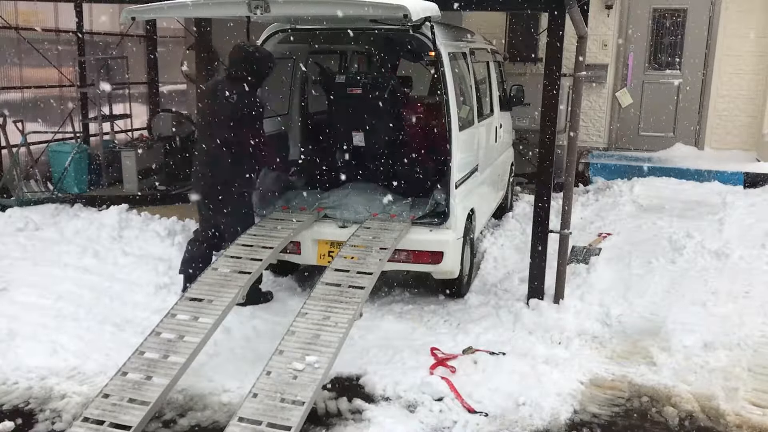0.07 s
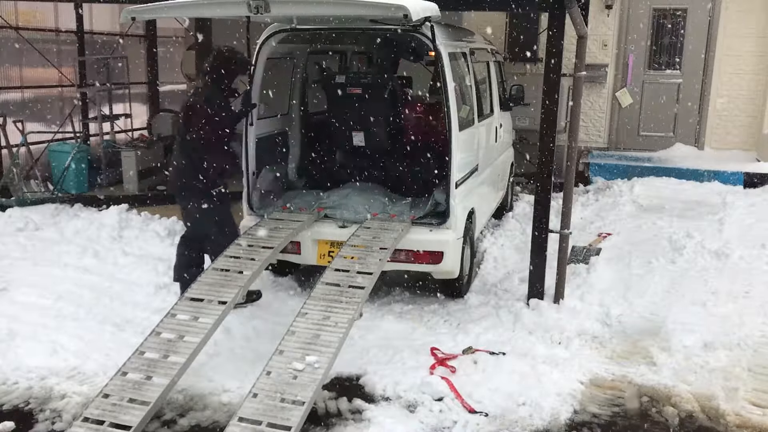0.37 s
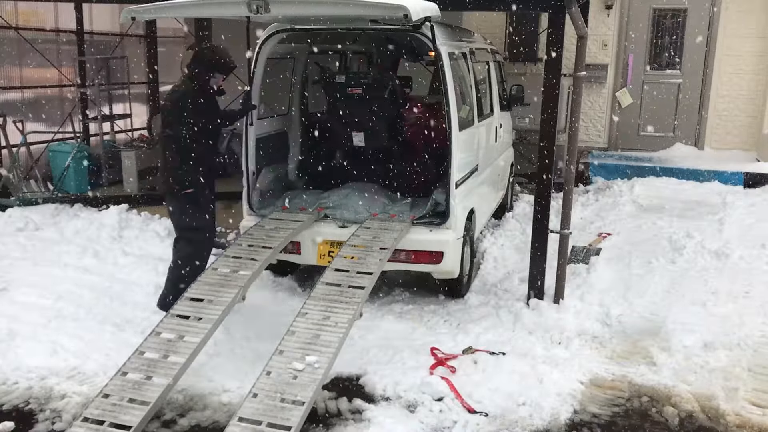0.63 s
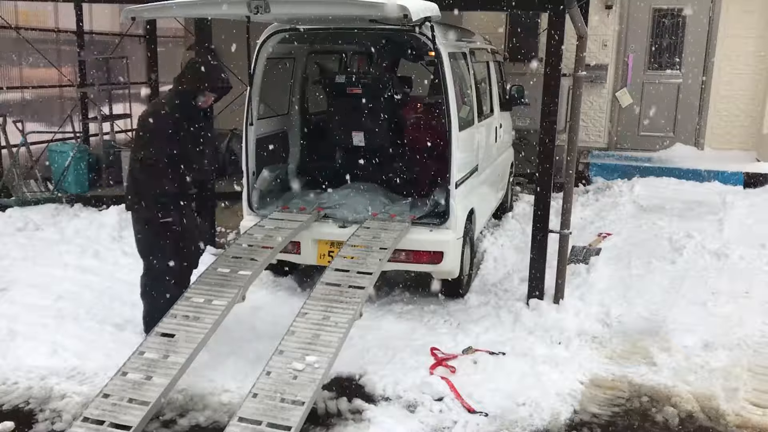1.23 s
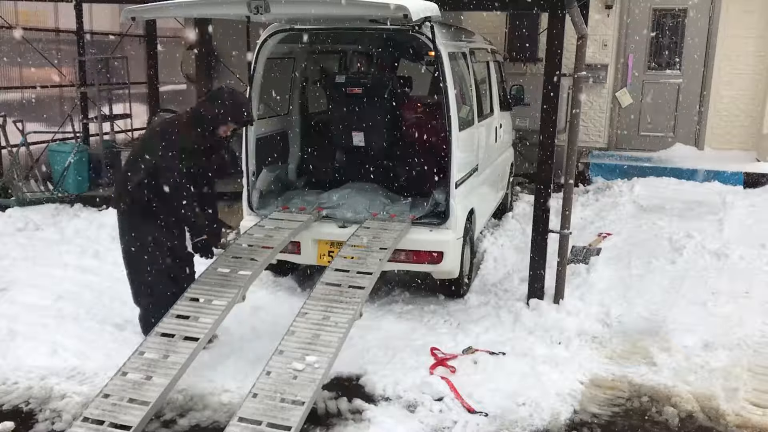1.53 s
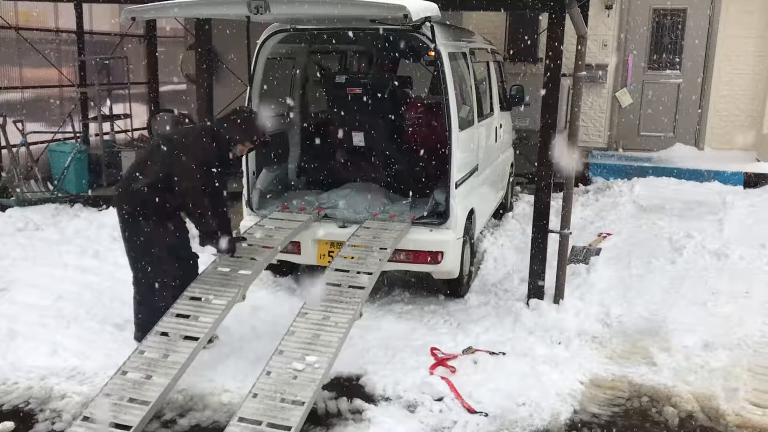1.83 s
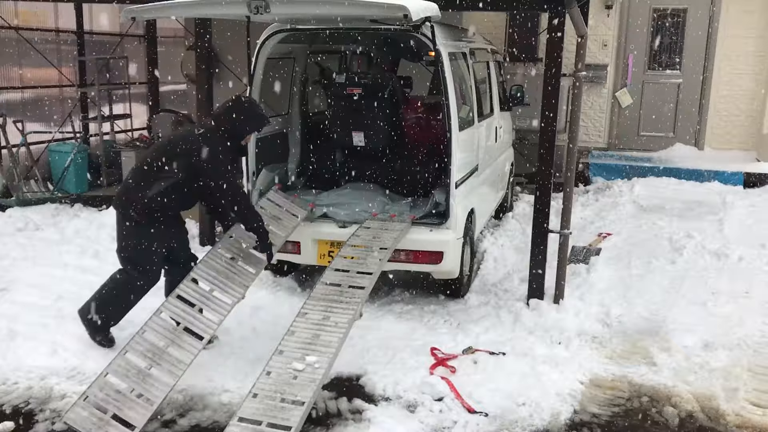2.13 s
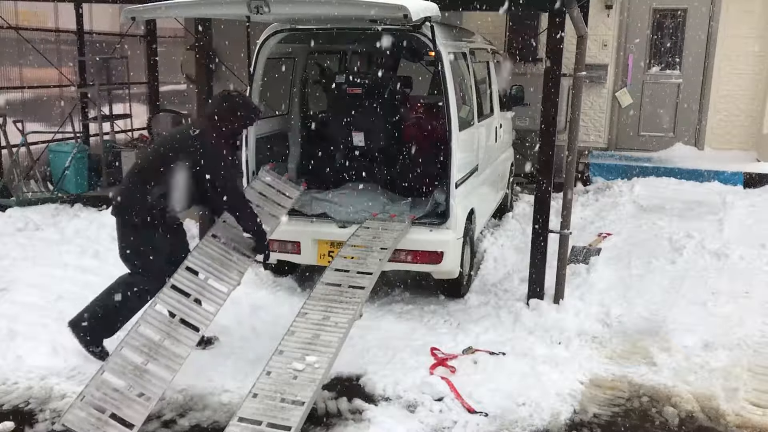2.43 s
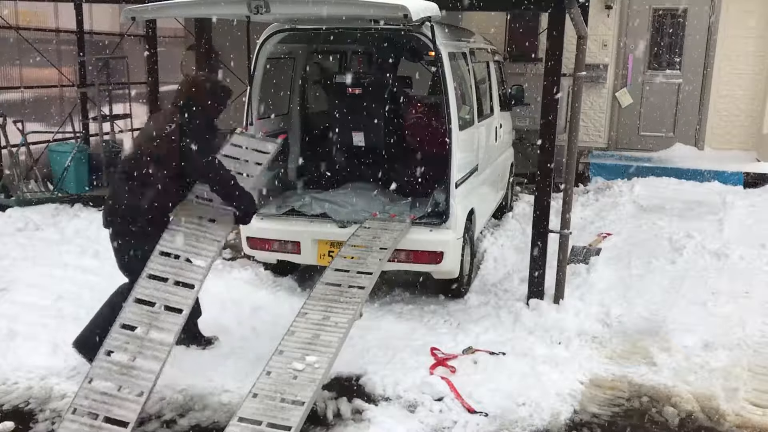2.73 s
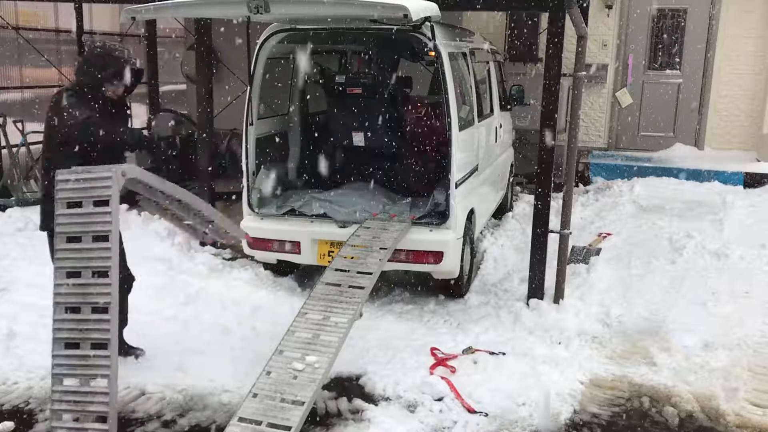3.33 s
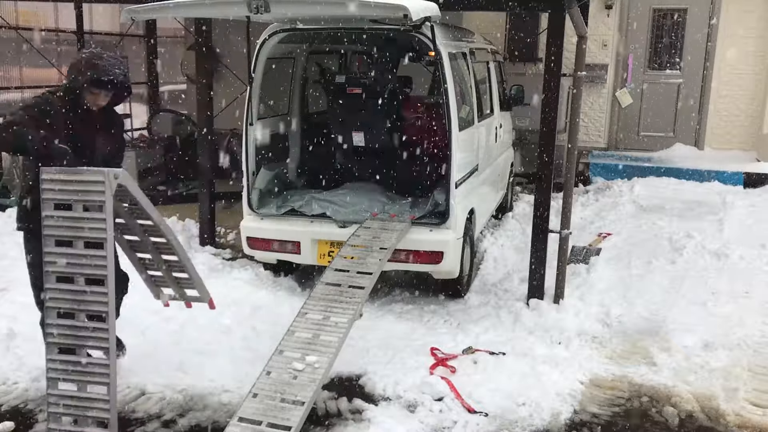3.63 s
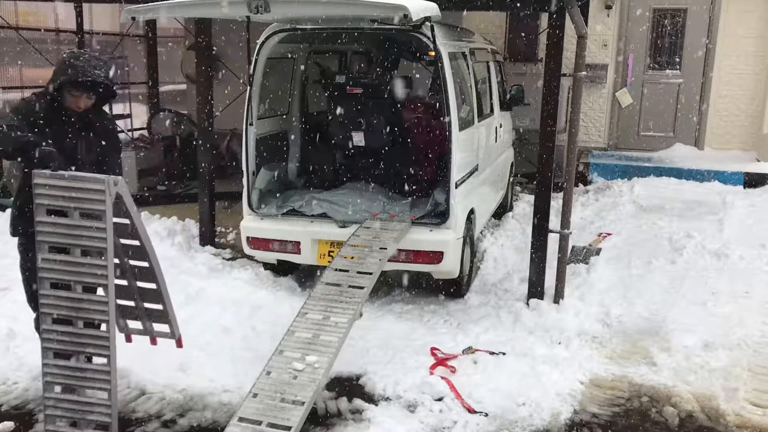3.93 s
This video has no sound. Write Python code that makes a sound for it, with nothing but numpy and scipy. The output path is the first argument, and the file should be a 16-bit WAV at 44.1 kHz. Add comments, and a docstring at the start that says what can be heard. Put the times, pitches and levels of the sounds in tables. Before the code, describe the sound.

A small engine coasts down from the start, its thumps, clatter and hiss slowing and weakening, with airy chuffs from 1 to 2 seconds, stopping near 2.7. An aluminium ramp clinks and scrapes lightly from 2 seconds, clanks loudly around 3, rattles softly, then shuts with a duller clank at 3.8. Snowflakes tick faintly close by throughout, and the yard adds slight reverberation.

```python
"""A snowy yard between walls, with snowflakes ticking close by. Inside a van, a snow blower's
single-cylinder engine coasts to a stop: its thumps, clatter and hiss follow one cycle, so they slow
and weaken together, and the last turns chuff out air. A folding aluminium ramp is dragged off the
bumper, clanks at its hinge and folds shut, each contact exciting its modes. The walls reverberate."""
import sys
import numpy as np
from scipy import signal
from scipy.fft import rfft, irfft, next_fast_len
from scipy.io import wavfile
from scipy.ndimage import map_coordinates

SR = 44100
rng = np.random.default_rng(int(sys.argv[2]) if len(sys.argv) > 2 else 0)


def log_audio(samples):
    """Write samples as a 16-bit WAV file to the path given in sys.argv[1]."""
    # one column per channel
    frames = np.atleast_2d(samples).T
    # limit to full scale, then quantise
    limited = np.clip(frames, -1, 1)
    pcm = np.round(limited * 32767).astype(np.int16)
    wavfile.write(sys.argv[1], SR, pcm)


N = 176400
FULL_SPEED = 12  # cycles per second
CLINK_OCTAVES, CLINK_T60_S = 0.036, 0.065

# Spectra of engine rumble, rushing air and struck aluminium. Each row: frequency in Hz, level in dB.
RUMBLE_SPECTRUM = [(22, -30), (60, 5.5), (130, 4), (280, -11.5), (400, -38.5)]
HISS_SPECTRUM = [(300, 5.5), (1300, -1.5), (3500, -0.5), (5500, -3), (8500, -8), (10500, -8), (14500, -6),
                 (16000, -16)]
CLASH_SPECTRUM = [(60, -12), (150, -14.5), (330, -12.5), (490, -12.5), (1100, -0.5), (2000, -6),
                  (4400, -5.5), (5000, -9), (6800, -7), (9000, -15), (16000, -6)]


def amp(db):
    """Decibels to amplitude ratio."""
    return 10 ** (np.asarray(db) / 20)


def unit(x):
    """Normalisation to rms 1."""
    return x / np.sqrt(np.mean(x ** 2) + 1e-20)


def along(points, hz):
    """Interpolation on a logarithmic frequency axis."""
    f, v = np.transpose(points)
    return np.interp(np.log(hz + 1), np.log(f + 1), v)


def filtered(x, response):
    """Linear filtering: the spectrum times a frequency response."""
    m = next_fast_len(len(x) + 16384)
    return irfft(rfft(x, m) * response(np.fft.rfftfreq(m, 1 / SR)), m)[:len(x)]


def noise(spectrum, peaks=(), size=N):
    """Coloured noise of rms 1 with resonance peaks."""
    lift = lambda f: sum(db / (1 + (2 * (f - hz) / width) ** 2) for hz, width, db in peaks)
    return unit(filtered(rng.standard_normal(size), lambda f: amp(along(spectrum, f) + lift(f))))


def narrow(hz, octaves, size=N):
    """Band-pass noise of rms 1 around one pitch."""
    band = lambda f: 1 / (1 + (np.log2((f + 1) / hz) / octaves) ** 2) ** 1.38
    return unit(filtered(rng.standard_normal(size), band))


def wobble(rate):
    """Smooth random modulation, rate knots a second."""
    return map_coordinates(rng.standard_normal(int(N * rate / SR) + 4), [np.arange(N) * rate / SR])


def dying(x, t60):
    """Frequency-dependent damping: each band decays at its own rate."""
    hz, t, bands = signal.stft(x, SR, nperseg=128)
    return signal.istft(bands * amp(-60 * t / along(t60, hz)[:, None]), SR, nperseg=128)[1][:len(x)]


def add(track, s, x):
    """Superposition of x on the track at s seconds."""
    i = round(s * SR)
    x = x[max(-i, 0):]
    part = track[max(i, 0):][:len(x)]
    part += x[:len(part)]


def taps(rows, octaves, t60):
    """Damped impacts: noise bands under exponential decays."""
    out, t = np.zeros(N), np.arange(SR // 4) / SR
    for s, db, hz in rows:
        shape = amp(-60 * t / t60) * (1 - np.exp(-t / 0.0006))
        hit = unit(shape * narrow(hz, octaves, size=len(t)))
        add(out, s, amp(db) * hit * np.sqrt(np.mean(shape ** 2)))
    return out


def passes(cycle, phase):
    """Samples at which the cycle crosses a phase."""
    return np.flatnonzero(np.diff(np.floor(cycle - phase)))


def strokes(cycle, rows, rest_db):
    """Cyclic envelope: Gaussian swells add in power over a floor."""
    swell = lambda phase, width: np.exp(-.5 * (((cycle - phase + .5) % 1 - .5) / width) ** 2)
    power = sum((amp(db) * swell(phase, width)) ** 2 for phase, width, db in rows)
    return np.sqrt(amp(rest_db) ** 2 + power)


def thump(hz):
    """A pressure pulse, centred half a second in, and its damped shudder."""
    width_cycles, shudder_db, shudder_t60_s = 0.46, -13.5, 0.41
    t = np.arange(SR) / SR - .5
    phase = t * hz * 2 ** (0.36 * rng.normal())
    pulse = np.cos(2 * np.pi * phase + .5 * rng.normal()) * np.exp(-.5 * (phase / width_cycles) ** 2)
    shudder = np.clip(phase + 1, 0, 1) * amp(shudder_db - 60 * np.abs(t) / shudder_t60_s)
    return pulse + shudder * narrow(hz, 1, size=SR)


def cylinder(speed, cycle):
    """A pressure pulse train weakens with falling speed and gives way to single thumps."""
    # Each row: phase in cycles, relative level in dB, pitch in Hz.
    fast_pulses = [(0.079, -3.5, 83), (0.19, -1, 120.4), (0.86, -4, 78)]
    # Each row: time in seconds, level in dB.
    last_pulses = [(1.468, -30), (1.526, -31.5), (1.575, -36), (1.649, -38.5), (1.722, -34), (1.871, -34),
                   (1.956, -32.5), (2.142, -35.5), (2.264, -38), (2.312, -46), (2.661, -38)]
    out = np.zeros(N)
    for phase, db, hz in fast_pulses:
        for i in passes(cycle, phase):
            gain = amp(db - 22 - 1.5 * (FULL_SPEED - speed[i]) + rng.normal())
            gain *= np.clip(speed[i] - FULL_SPEED / 2 + 1, 0, 1)  # fades out below half speed
            add(out, i / SR - .5, gain * thump(hz))
    for s, db in last_pulses:
        add(out, s - .5, amp(db) * thump(hz=85))
    return out


def hiss(speed, cycle):
    """Air noise, amplitude-modulated by the strokes."""
    # Each row: phase in cycles, width in cycles, relative level in dB.
    air_strokes = [(.07, 0.057, 1.5), (.19, 0.12, -3), (.48, 0.056, -6.5)]
    level = amp(-40.5) * (speed / FULL_SPEED) ** 1.4
    return level * strokes(cycle, air_strokes, rest_db=-39) * noise(HISS_SPECTRUM)


def clatter(speed, cycle):
    """Cyclic mechanical noise excites the casing's resonances."""
    # Each row: phase in cycles, width in cycles, relative level in dB.
    bursts = [(0.22, 0.068, -2), (0.732, 0.22, -3), (0.52, 0.12, -3.5)]
    # Each row: frequency in Hz, level in dB.
    spectrum = [(260, -12), (450, -4), (730, -2.5), (1310, -5.5), (1710, -12), (2990, -7.5), (4920, -14),
                (15000, -39)]
    # Each row: frequency in Hz, bandwidth in Hz, lift in dB.
    casing_modes = [(593, 27, 7.5), (1028, 114, 8.5), (1330, 130, 9), (2146, 1100, 9), (3080, 24, 12.5)]
    level = amp(-38.5) * (speed / FULL_SPEED) ** 0.97
    return level * strokes(cycle, bursts, rest_db=-4.5) * noise(spectrum, casing_modes)


def van_boom(speed, cycle):
    """Forced vibration: fast strokes drive the van body's modes."""
    # Each row: phase in cycles, width in cycles, relative level in dB.
    drive = [(.33, 0.35, -1.5)]
    # Each row: frequency in Hz, bandwidth in Hz, lift in dB.
    body_modes = [(181, 13.4, 11.5), (258, 16.8, 19), (310.3, 39, 25.5)]
    level = amp(-31 - 3 * (FULL_SPEED - speed))
    return level * strokes(cycle, drive, rest_db=-16.5) * noise(RUMBLE_SPECTRUM, body_modes)


def casing_clacks(speed, cycle):
    """Two impacts a cycle, a compression clack and a valve tick, ring the casing's modes."""
    # Each row: phase in cycles, level in dB.
    impacts = [(.19, -36.5), (.71, -39.5)]
    # Each row: frequency in Hz, relative level in dB.
    modes = [(1345, -4), (2400, -5.5), (3060, -9.5)]
    clacks = [(i / SR, db + mode_db - (FULL_SPEED - speed[i]) / 2, hz)
              for phase, db in impacts for i in passes(cycle, phase) for hz, mode_db in modes]
    return taps(clacks, CLINK_OCTAVES, CLINK_T60_S)


def engine():
    """Coasting rotation: phase, the integral of speed, keeps the parts in step."""
    # Each row: time in seconds, speed in cycles per second.
    run_down = [(0.0, 12.148), (0.35, 10.609), (0.75, 8.617), (1.2, 7.039), (1.6, 5.198), (2.0, 3.879),
                (2.4, 2.683), (2.8, 1.198)]
    start_cycle, stop_s = -.46, 2.75
    t = np.arange(N) / SR
    speed = np.interp(t, *np.transpose(run_down))
    cycle = start_cycle + np.cumsum(speed) / SR
    turning = np.clip((stop_s - t) * 10, 0, 1)
    thumps = cylinder(speed, cycle)
    rumble = amp(-38.5 - 2.82 * (FULL_SPEED - speed)) * noise(RUMBLE_SPECTRUM)
    parts = sum(part(speed, cycle) for part in (hiss, clatter, van_boom, casing_clacks))
    return turning * (thumps + rumble + parts)


def snowflakes():
    """Randomly timed impacts of snow, each a heavily damped sinusoid."""
    flakes_per_s, centre_hz = 41, 6600
    out, t = np.zeros(N), np.arange(256) / SR
    for when, pitch, size in rng.random((int(flakes_per_s * N / SR), 3)):
        hz = centre_hz * 2 ** (2 * pitch - 1)
        tick = np.sin(2 * np.pi * hz * t) * np.exp(-t * hz / 2)
        add(out, when * N / SR, amp(-50 + 8 * size ** 2) * tick)
    return out


def outdoor_air():
    """Stationary ambient noise, strongest in the bass."""
    # Each row: frequency in Hz, level in dB.
    spectrum = [(25, -15), (65, -3), (130, -6), (450, -13), (1100, -14), (2500, -21.5), (15500, -30)]
    return amp(-56.5) * noise(spectrum)


def yard(x):
    """Reverberation: reflections from van and house walls merge into a delayed tail."""
    # Each row: frequency in Hz, T60 in seconds.
    decay_times = [(100, 0.91), (1000, 0.45), (4000, 0.52), (8000, 0.51), (14000, 0.28)]
    tail = dying(rng.standard_normal(SR), decay_times)
    response = np.pad(tail / np.linalg.norm(tail), (int(.015 * SR), 0))
    return amp(-16) * signal.fftconvolve(x, response)[:N]


def chuffs():
    """Gritty air jets from the slowing cylinder excite a casing resonance."""
    # Each row: start in seconds, level in dB.
    puffs = [(1.127, -40.5), (1.144, -37.5), (1.271, -39), (1.293, -37.5), (1.431, -37), (1.457, -38),
             (1.611, -40), (1.639, -37.5), (1.853, -40.5), (1.939, -45), (2.129, -44)]
    # Each row: frequency in Hz, bandwidth in Hz, lift in dB.
    passage_modes = [(6320, 90, 7.5), (8300, 200, 9.5)]
    attack_s, hold_s, ring_db_per_s = 0.0025, 0.013, 11
    t = np.arange(SR // 2) / SR
    jet, ring_power = np.zeros(N), np.zeros(N)
    for s, db in puffs:
        decay = lambda t60: amp(db - 60 * np.maximum(t - hold_s, 0) / t60)
        add(jet, s, decay(t60=0.1) * (1 - np.exp(-t / attack_s)))
        growth = amp(ring_db_per_s * (s - puffs[0][0]))  # later, slower strokes ring more
        add(ring_power, s, (growth * decay(t60=0.22) * np.minimum(t / hold_s, 1)) ** 2)
    air = unit(amp(0.5 * wobble(510)) * noise(HISS_SPECTRUM, passage_modes))
    return jet * air + amp(-4) * np.sqrt(ring_power) * narrow(hz=1250, octaves=0.25)


def clinks():
    """Light impacts ring narrow metal resonances of engine and ramp."""
    # Each row: start in seconds, level in dB, pitch in Hz.
    hits = [(2.016, -36, 1350), (2.078, -33, 2980), (2.864, -36.5, 4160), (3.488, -43.5, 3280),
            (3.488, -41.5, 1610), (2.358, -36, 1320)]
    return taps(hits, CLINK_OCTAVES, CLINK_T60_S)


def aluminium(s, size):
    """The ramp's modal response at s seconds: other modes stand out once the hinge has swung."""
    # Each row: frequency in Hz, lift in dB when straight, lift in dB when swung.
    modes = [(349, 15.5, 13.5), (605.5, 9.5, 13.5), (687, 12, 10), (1087, 12, 5.5), (1376, 10, 4),
             (1483, 3.5, -5), (1730, 6, -26), (2376, 5, 16), (2940, 5, 8), (5380, 9.5, 11), (6650, 9.5, 14)]
    swing_s, width_hz = 3.1, 32
    peaks = [(hz, width_hz, straight if s < swing_s else swung) for hz, straight, swung in modes]
    return noise(CLASH_SPECTRUM, peaks, size)


def clanks():
    """Impact excitation: a clash dies into a rattle; soft contacts are dull, light ones thin."""
    # Each row: start in seconds, relative level in dB, low-pass and high-pass corners in Hz.
    contacts = [(2.078, -34, 3920, 1200), (2.098, -37.5, 3500, 600), (2.427, -35.5, 4750, 2460),
                (2.451, -38.5, 3400, 600), (2.835, -36, 2450, 653), (2.863, -34, 3980, 1456),
                (2.932, -16.5, 1910, 343), (2.941, -11.5, 5950, 696), (2.951, -14, 9100, 404),
                (2.957, -14.5, 7600, 670), (2.971, -19.5, 3000, 600), (2.9875, -18.5, 10500, 1480),
                (3.252, -30, 3970, 402), (3.278, -26.5, 3120, 385), (3.819, -19, 1000, 198),
                (3.826, -38.5, 5900, 400), (3.833, -20, 5000, 315), (3.8369, -29, 2900, 200)]
    # Each row: frequency in Hz, T60 in seconds.
    clash_t60 = [(150, 0.34), (1000, 0.17), (4000, 0.13), (12000, 0.085)]
    rattle_t60 = [(hz, 0.42 * (1000 / hz) ** .85) for hz, _ in CLASH_SPECTRUM]  # low modes ring longer
    out, t = np.zeros(N), np.arange(SR // 2) / SR
    attack = 1 - np.exp(-t / 0.00023)
    for s, db, dull_hz, thin_hz in contacts:
        rattle = dying(aluminium(s, len(t)), rattle_t60) * amp(-18 + 3 * wobble(158)[:len(t)])
        clash = dying(aluminium(s, len(t)), clash_t60)
        band = np.vstack([signal.butter(2, dull_hz, fs=SR, output="sos"),
                          signal.butter(1, thin_hz, "high", fs=SR, output="sos")])
        add(out, s, amp(db + 4) * signal.sosfilt(band, (rattle + clash) * attack))
    return out


def scrapes():
    """Stick-slip friction: the ramp's edge slides in a rough stream of tiny contacts."""
    # Each row: start in seconds, length in seconds, level in dB.
    slides = [(2.085, 0.17, -45), (2.338, 0.089, -46), (3.282, 0.11, -48), (3.47, 0.097, -46.5)]
    rough_db, dull_hz = 3.5, 2490
    envelope = np.zeros(N)
    for s, length, db in slides:
        add(envelope, s, amp(db) * signal.windows.tukey(int(length * SR), .5))
    friction = amp(rough_db * wobble(300)) * aluminium(0, N)
    return envelope * unit(filtered(friction, lambda f: 1 / (1 + 1j * f / dull_hz)))


def knocks():
    """Heavily damped impacts of boots and the ramp's foot sound broad and dull."""
    # Each row: start in seconds, level in dB, pitch in Hz.
    hits = [(2.523, -31.5, 316), (3.414, -36.5, 345), (3.833, -26.5, 664)]
    return taps(hits, octaves=0.89, t60=0.046)


def scene():
    """Superposition of direct sound, its reverberation, snow and quiet air."""
    direct = engine() + chuffs() + clanks() + scrapes() + knocks() + clinks()
    return (direct + yard(direct) + snowflakes() + outdoor_air())[None]


def record(dry):
    """Band limiting thins the deepest bass and cuts the highest treble steeply."""
    low_hz, top_hz = 40, 15900
    band = lambda hz: hz ** 2 / np.hypot(hz ** 2, low_hz ** 2) / (1 + (hz / top_hz) ** 160)
    return filtered(dry[0], band)[None]


dry = scene()
out = record(dry)
log_audio(out)
```